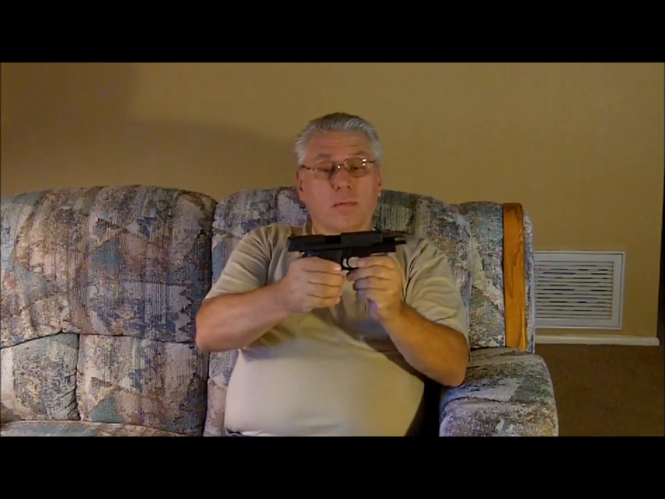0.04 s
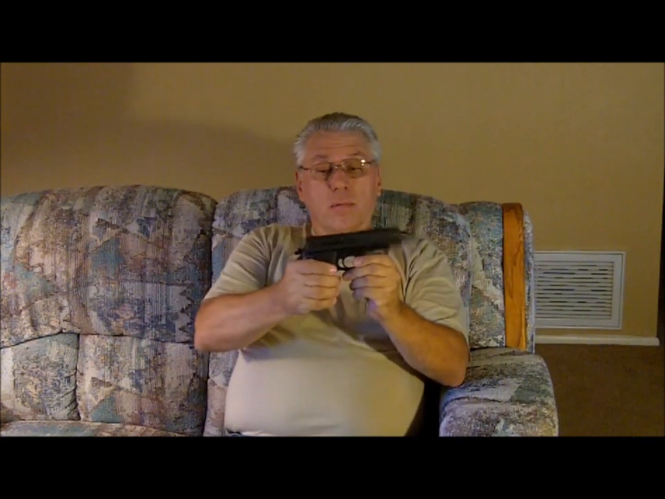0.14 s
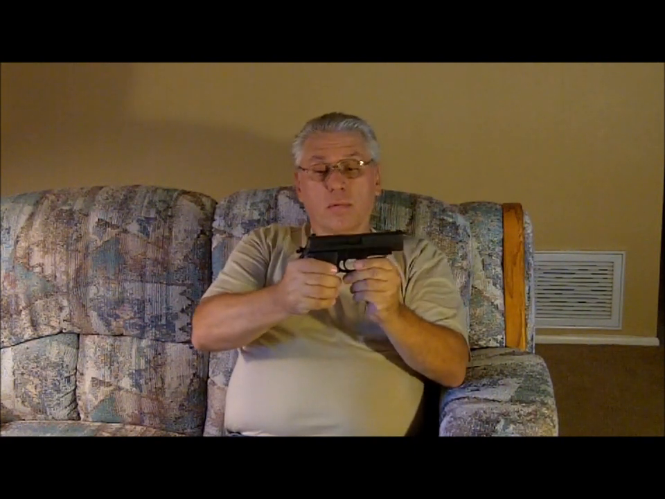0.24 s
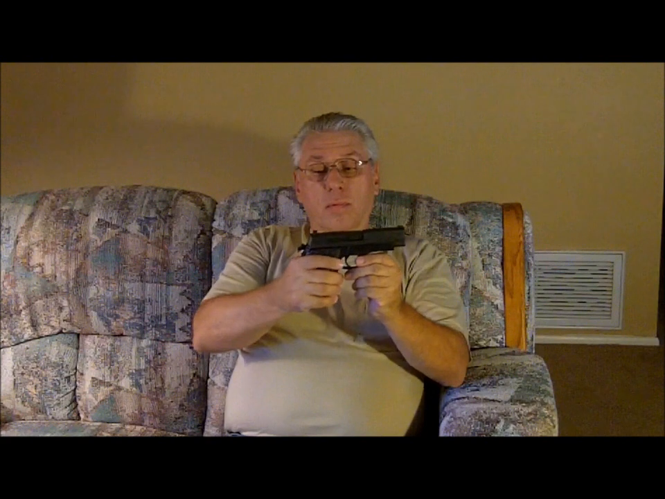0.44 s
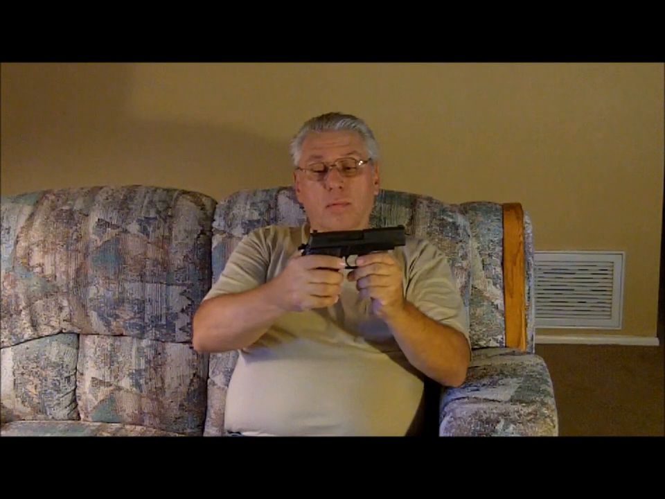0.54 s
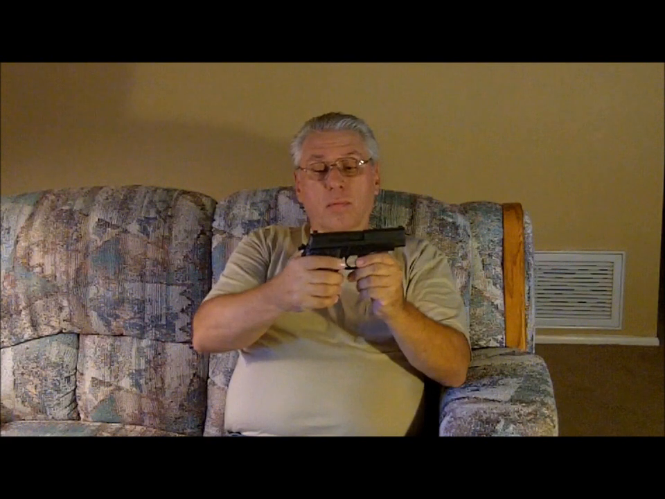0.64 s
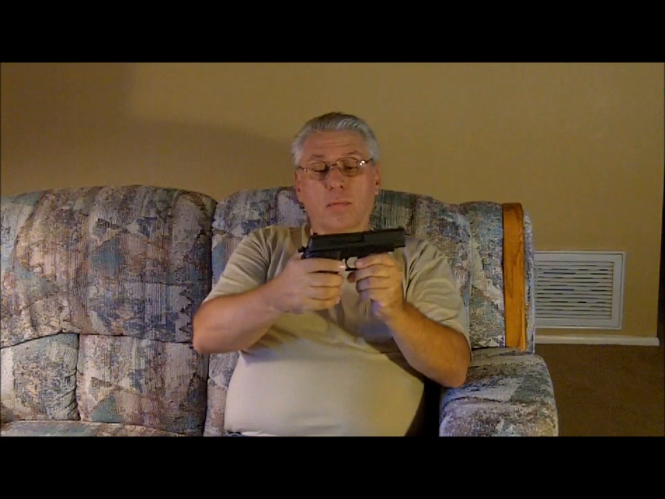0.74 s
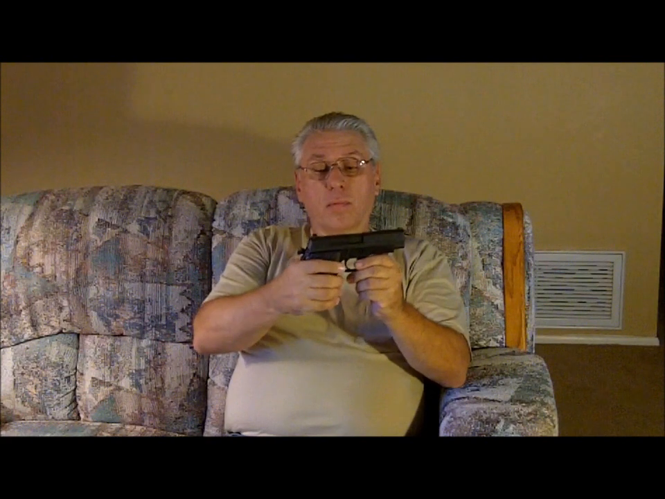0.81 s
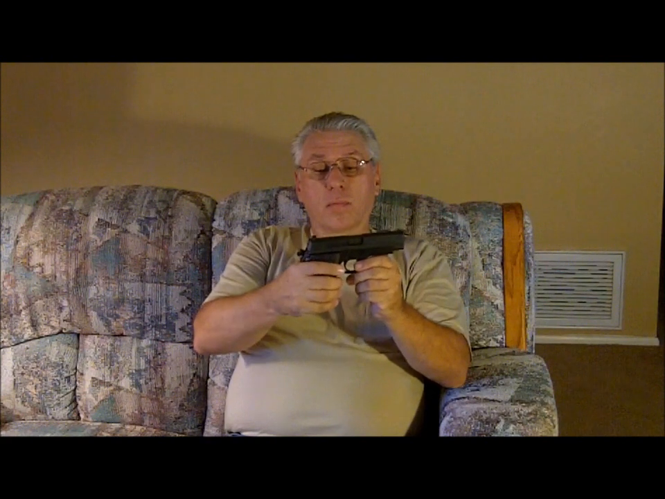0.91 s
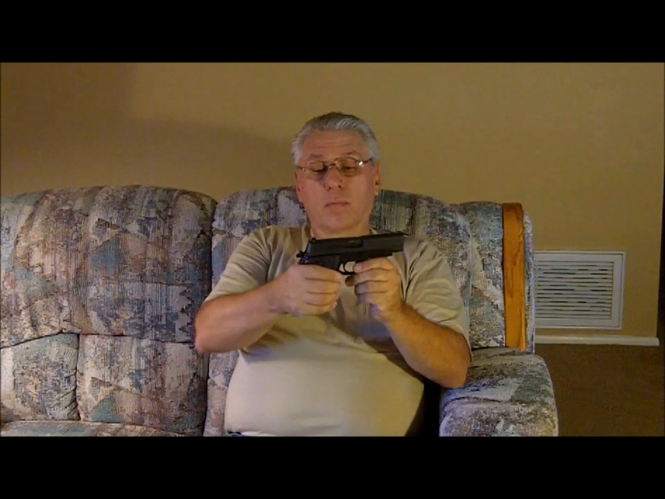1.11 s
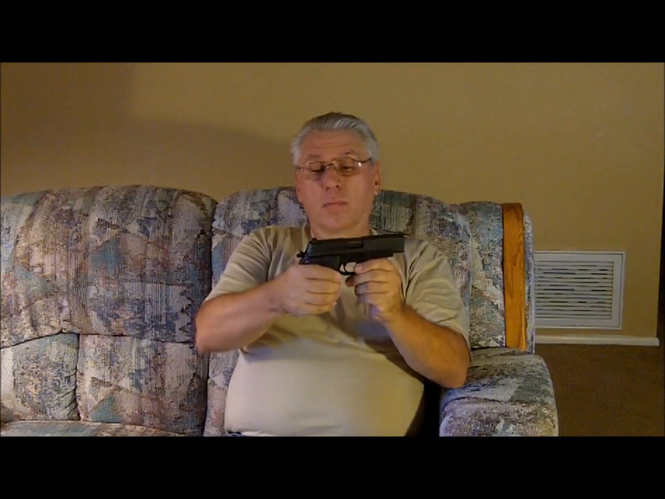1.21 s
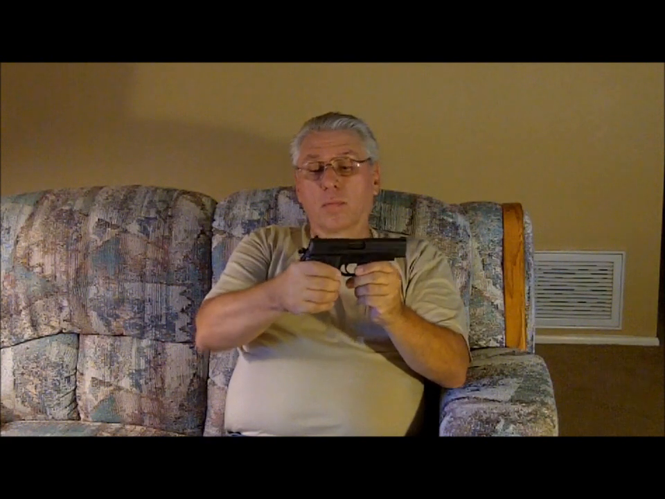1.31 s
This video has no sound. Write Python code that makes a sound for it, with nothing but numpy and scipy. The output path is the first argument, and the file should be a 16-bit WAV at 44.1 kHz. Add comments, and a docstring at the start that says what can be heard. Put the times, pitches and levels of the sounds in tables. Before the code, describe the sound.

A pistol clicks lightly, then its slide snaps forward with a loud metal clack indoors.

```python
"""Over faint room noise and rustling hands, a pistol's lever clicks; then the slide runs forward and
slams shut in a double clack. Each metal contact is a short crack that rings frame, magazine and steel
briefly, while a spring sings on and the living room answers. Soft handling bumps, one dull thud and a
deep microphone rumble lie underneath. The camera's gain control ducks at the clack and lets the room
noise swell back."""
import sys
import numpy as np
from scipy import signal
from scipy.fft import rfft, irfft, next_fast_len
from scipy.io import wavfile
from scipy.ndimage import uniform_filter1d

SR = 44100
rng = np.random.default_rng(int(sys.argv[2]) if len(sys.argv) > 2 else 0)


def output_pcm(signal):
    """Save a mono or channel-first signal as 16-bit PCM at the path in sys.argv[1].

    Samples are clipped to [-1, 1] before scaling.
    """
    pcm = np.clip(np.atleast_2d(signal).T, -1, 1) * 32767
    wavfile.write(sys.argv[1], SR, np.round(pcm).astype(np.int16))


N = 59535

# The tone of metal cracking or scraping on metal. Each row: frequency in Hz, level in dB.
CRACK_SPECTRUM = [(80, -5.5), (200, -12), (450, -10.5), (900, -11), (2000, 0.5), (3200, -1), (4400, 0),
                  (7700, 0.5), (9500, -6.5), (12000, -8.5), (14700, -6.5)]


def amp(db):
    """Decibels to gain."""
    return 10 ** (np.asarray(db) / 20)


def unit(x):
    """Scale to rms 1."""
    return x / np.sqrt(np.mean(x ** 2) + 1e-20)


def along(points, hz):
    """Read (Hz, value) points on a log frequency axis."""
    freqs, values = np.transpose(points)
    return np.interp(np.log(hz + 1), np.log(freqs + 1), values)


def fader(points):
    """Turn (seconds, dB) points into a gain for every sample."""
    return amp(np.interp(np.arange(N) / SR, *np.transpose(points)))


def filtered(x, response):
    """Equalise x with a gain given as a function of Hz."""
    size = next_fast_len(N + SR // 2)
    return irfft(rfft(x, size) * response(np.fft.rfftfreq(size, 1 / SR)), size)[..., :N]


def noise(spectrum, alike, pan_db):
    """Coloured stereo noise of rms 1; alike is the sides' correlation, and positive pan leans left."""
    mid, side = rng.standard_normal((2, N))
    angle = np.arccos(alike) / 2
    mid, side = np.cos(angle) * mid, np.sin(angle) * side
    white = np.array([mid + side, mid - side]) * amp([[pan_db], [-pan_db]])
    return unit(filtered(white, lambda hz: amp(along(spectrum, hz))))


def room_noise():
    """The room's air: a steady, dark bed of noise."""
    # Each row: frequency in Hz, level in dB.
    air_spectrum = [(30, 2), (70, -0.5), (130, -2.5), (220, -2), (450, -6), (1000, -14.5), (2000, -20),
                    (4000, -27.5), (8000, -31), (15000, -32.5)]
    return amp(-42.5) * noise(air_spectrum, alike=0.64, pan_db=0)


def microphone_rumble():
    """A deep rumble on the microphone swells and sinks, leaning left."""
    # Mostly sub-bass. Each row: frequency in Hz, level in dB.
    rumble_spectrum = [(2, -9), (8, 0), (14, 0.5), (25, -13.5), (50, -33), (120, -59), (400, -110)]
    # Its swells. Each row: time in seconds, level in dB.
    rumble_level = [(0, -33), (.3, -22.5), (.58, -17.5), (.75, -36.5), (1.05, -27), (1.35, -33.5)]
    return fader(rumble_level) * noise(rumble_spectrum, alike=0.92, pan_db=5)


def hand_rustle():
    """Hands rub softly on the grip."""
    # The tone of the rubbing. Each row: frequency in Hz, level in dB.
    rustle_spectrum = [(60, -0.5), (150, 2.5), (400, 0.5), (1500, -6.5), (5000, -8.5), (8000, -13.5),
                       (15000, -25)]
    # How it comes and goes. Each row: time in seconds, level in dB.
    rustle_level = [(0, -55), (.2, -49.5), (.33, -65), (.6, -60), (.8, -52), (.97, -61.5), (1.27, -56),
                    (1.35, -44.5)]
    return fader(rustle_level) * noise(rustle_spectrum, alike=0.68, pan_db=0.7)


def ring(modes, t, scatter_db=2.5):
    """A part rings in damped modes, struck a little differently each time."""
    return sum(amp(db + scatter_db * rng.normal() - 60 * t / t60)
               * np.sin(2 * np.pi * (hz * t + rng.random())) for hz, db, t60 in modes)


def spring(t, centre_hz=7400, width_hz=190, t60_s=0.57):
    """The spring's many close modes blur into one narrow, singing band."""
    band = filtered(rng.standard_normal(N), lambda hz: np.exp(-((hz - centre_hz) / width_hz) ** 2 / 2))
    return unit(band) * amp(-60 * t / t60_s)


def metal_contacts(rise_s=0.00036):
    """Each contact cracks and rings frame, magazine, steel and spring; each side hears it differently."""
    # Lever clicks, then the double clack. Each row: start in seconds, crack level in dB, crack t60 in
    # seconds, brightness in dB per octave, then gains in dB for frame, magazine and steel with spring.
    contacts = [(.1105, -48, .016, -1, -67.5, -41.5, -54.5),
                (0.1343, -20.5, 0.018, -2.5, -24.5, -44.5, -44), (.1420, -32, 0.02, -2, -52, -56, -44.5),
                (0.243, -6.5, 0.017, .5, -14.5, -12, -21.5), (0.248, -3.5, 0.0094, 2, -19, 3, -17),
                (0.2656, 15, .018, 0.6, -15.5, -8, -3.5), (0.2689, 10, 0.019, -1.4, -16.5, -11.5, 0),
                (.2742, -1.5, .025, 2.7, -33.5, -21, -5)]
    # The frame's knock, the magazine's clank and the steel's ring.
    # Each row: frequency in Hz, relative level in dB, t60 in seconds.
    frame_modes = [(360, -18, .03), (680, -2, .03), (753, -2.5, .025), (1096, -1, 0.028), (1635, -10, .025),
                   (2160, -6, 0.02)]
    magazine_modes = [(3288, -6, .02), (3640, -1, 0.01), (4057, -2.5, .02), (4790, -6, 0.013)]
    steel_modes = [(1507, -11, 0.2), (2133, -4.5, 0.059), (2412, -5, 0.054), (3930, -7, 0.076),
                   (4230, -1.5, .08), (4875, -4, .08), (5450, -2.5, .06), (6400, -5, 0.034),
                   (6920, -2, .06), (7200, -1.5, 0.072), (8000, -0.5, 0.055), (8160, -5, 0.1),
                   (12250, -1.5, 0.077), (14600, -5.5, .05)]
    t = np.arange(N) / SR
    out = np.zeros((2, 2 * N))
    for start, crack_db, t60, brightness, frame_db, magazine_db, steel_db in contacts:
        colour = lambda hz: amp(along(CRACK_SPECTRUM, hz) + brightness * np.log2((hz + 100) / 4000))
        for side in out:
            crack = unit(filtered(rng.standard_normal(N), colour)) * amp(crack_db - 60 * t / t60)
            body = amp(frame_db) * ring(frame_modes, t) + amp(magazine_db) * ring(magazine_modes, t)
            shimmer = amp(steel_db - 8) * (amp(-13) * spring(t) + ring(steel_modes, t))
            side[round(start * SR):][:N] += (crack + body + shimmer) * (1 - np.exp(-t / rise_s))
    return out[:, :N]


def reverb(x, decay, pan_db, build_s):
    """A diffuse tail builds up, then dies at its own speed in each band; each side feeds both."""
    hz, t, bands = signal.stft(rng.standard_normal((2, 2, N)), SR, nperseg=256)
    tail = signal.istft(bands * amp(-60 * t / along(decay, hz)[:, None]), SR, nperseg=256)[1][..., :N]
    tail *= 1 - np.exp(-np.arange(N) / SR / build_s)
    tail /= np.sqrt(np.sum(tail ** 2) / 2)
    wet = signal.fftconvolve(x[None], tail, axes=2).sum(axis=1)
    return wet[:, :N] * amp([[pan_db], [-pan_db]])


def living_room(gun):
    """Near surfaces answer quickly; the whole room follows with a longer, brighter tail."""
    # How the early and late reflections die. Each row: frequency in Hz, t60 in seconds.
    early_decay = [(300, 0.17), (3000, 0.1651), (14000, 0.08)]
    late_decay = [(200, .25), (700, 0.74), (2000, 0.64), (4500, .6), (8000, 0.45), (14000, 0.35)]
    # The late tail is thin in the bass. Each row: frequency in Hz, gain in dB.
    late_colour = [(120, -40), (250, -26.5), (480, -13), (660, -1), (900, -4), (1400, -3), (3000, -4),
                   (5500, 1), (7400, 1), (9000, 3), (14000, -2.5)]
    early = reverb(gun, early_decay, pan_db=0.15, build_s=0.0026)
    late = reverb(gun, late_decay, pan_db=-1.2, build_s=0.016)
    late = filtered(late, lambda hz: amp(along(late_colour, hz)))
    return amp(-9) * early + amp(-11.5) * late


def handling_bumps():
    """Handling makes soft bumps, each a brief swell of bass noise."""
    # Each row: peak time in seconds, half-width in seconds, level in dB.
    bumps = [(0.168, 0.026, -37.5), (0.256, .022, -33), (.61, 0.041, -38.5), (0.846, 0.037, -38.5),
             (1.322, .05, -32)]
    # Their muffled tone. Each row: frequency in Hz, level in dB.
    bump_spectrum = [(15, -2), (30, 0), (60, -1), (100, -10), (200, -21), (400, -28.5), (1500, -69)]
    t = np.arange(N) / SR
    swell = sum(amp(db) * np.exp(-((t - peak) / half_width) ** 2) for peak, half_width, db in bumps)
    return swell * noise(bump_spectrum, alike=0.84, pan_db=-2)


def slide_scrape(start_s=0.246, stop_s=0.266, slips_per_s=1700, fade_s=0.0013):
    """The slide scrapes along its rails in tiny slips as it runs forward, up to the clack."""
    t = np.arange(N) / SR
    slips = rng.standard_normal(N) * (0.095 + (rng.random(N) < slips_per_s / SR))  # hiss plus grains
    stroke = np.clip(np.minimum(t - start_s, stop_s - t) / fade_s, 0, 1)
    return amp(-18) * stroke * unit(filtered(slips, lambda hz: amp(along(CRACK_SPECTRUM, hz))))


def dull_thud(peak_s=0.876, half_width_s=0.011, pitch_hz=189.4):
    """One dull thud to the right: a few cycles of a low tone."""
    t = np.arange(N) / SR
    swell = np.exp(-((t - peak_s) / half_width_s) ** 2)
    return swell * np.sin(2 * np.pi * pitch_hz * t) * amp([[-42], [-32]])


def gain_control(x, threshold_db=-6, attack_s=0.003, release_db_per_s=13.5):
    """The camera ducks fast when the level passes its threshold, then recovers slowly."""
    power = np.abs(uniform_filter1d(np.mean(x ** 2, axis=0), size=256))
    over_db = np.maximum(10 * np.log10(power + 1e-12) - threshold_db, 0)
    recovery_db = release_db_per_s * np.arange(N) / SR
    held_db = np.maximum.accumulate(over_db + recovery_db) - recovery_db
    pole = np.exp(-1 / (attack_s * SR))
    duck_db = signal.lfilter([1 - pole], [1, -pole], held_db)
    return x * amp(-duck_db)


def scene(right_lag_s=0.0017, crosstalk_db=-11.5):
    """The pistol sounds a moment later on the right than on the left, the room follows, and each side leaks
    into the other."""
    gun = metal_contacts() + slide_scrape()
    delayed_right = np.pad(gun[1], (round(right_lag_s * SR), 0))[:N]
    heard = np.array([gun[0], delayed_right]) + living_room(gun)
    background = room_noise() + microphone_rumble() + hand_rustle() + handling_bumps() + dull_thud()
    return heard + amp(crosstalk_db) * heard[::-1] + background


def record(dry, ceiling=0.89, top_hz=15000):
    """The camera rides the gain, clips the peaks that slip through and cuts the top treble steeply."""
    clipped = np.clip(gain_control(dry), -ceiling, ceiling)
    return filtered(clipped, lambda hz: 1 / np.sqrt(1 + (hz / top_hz) ** 140))


dry = scene()
out = record(dry)
output_pcm(out)
```